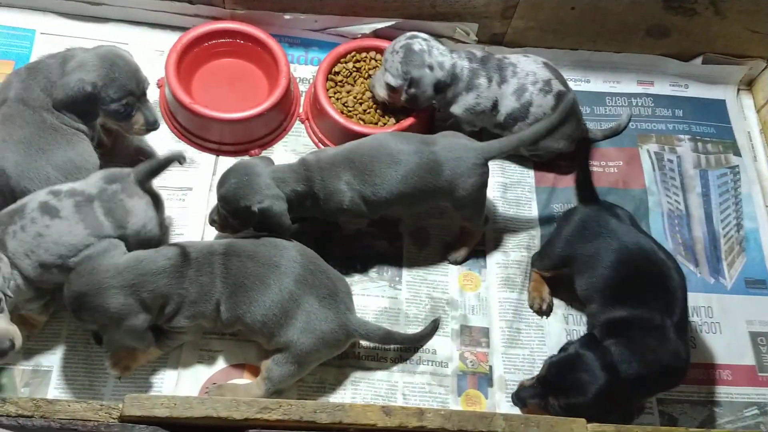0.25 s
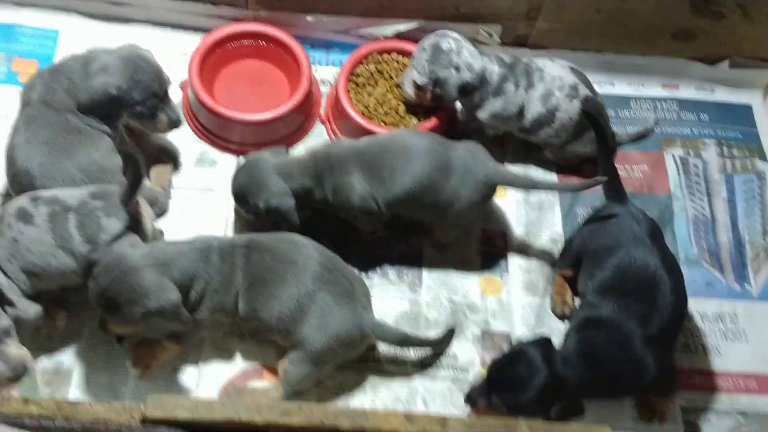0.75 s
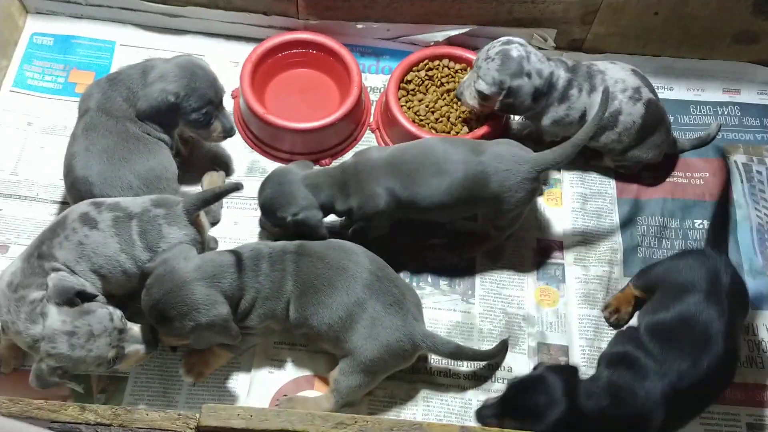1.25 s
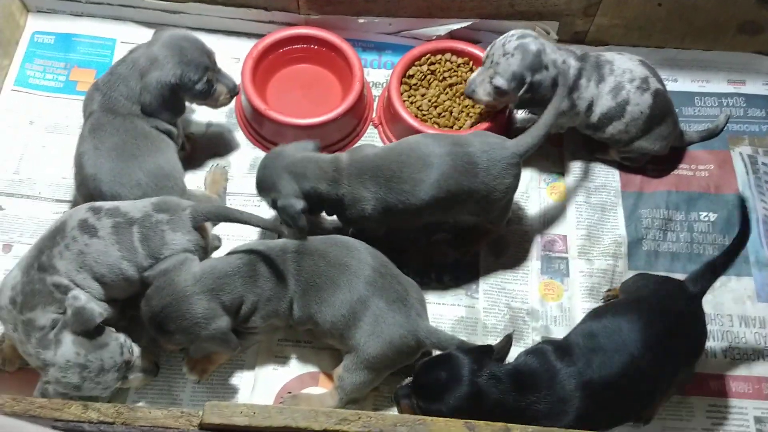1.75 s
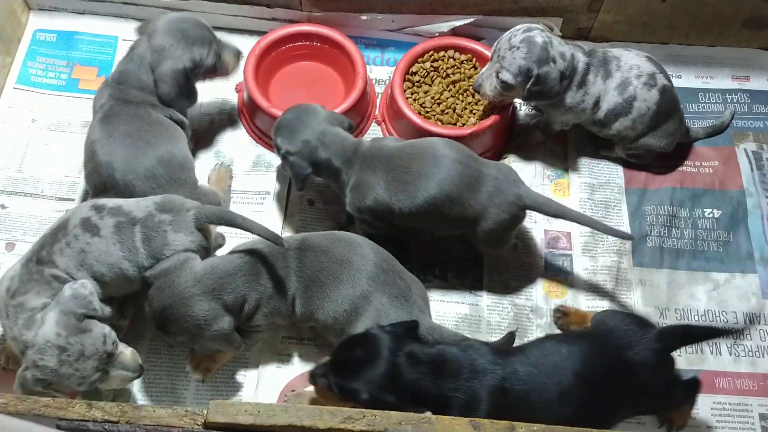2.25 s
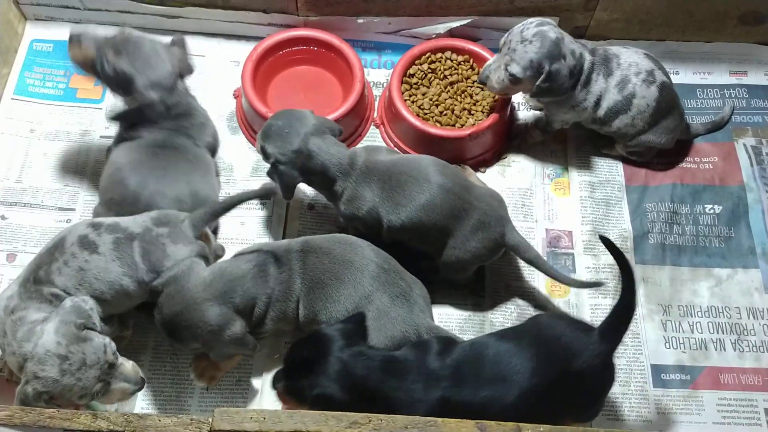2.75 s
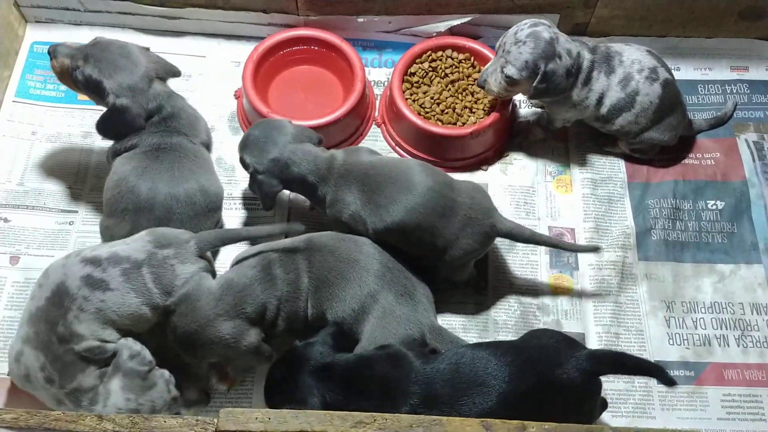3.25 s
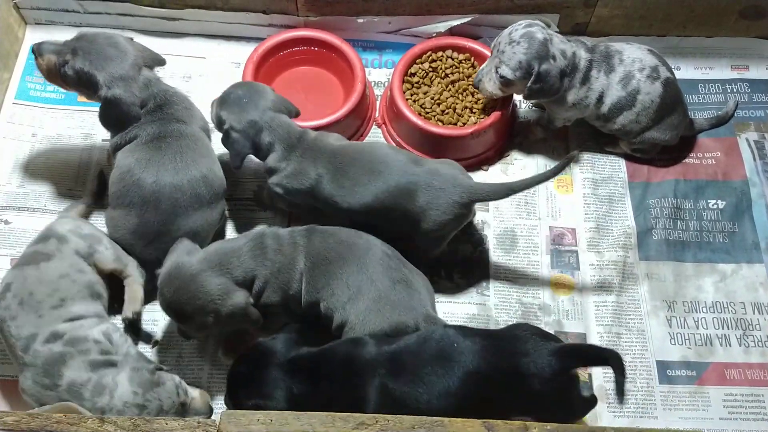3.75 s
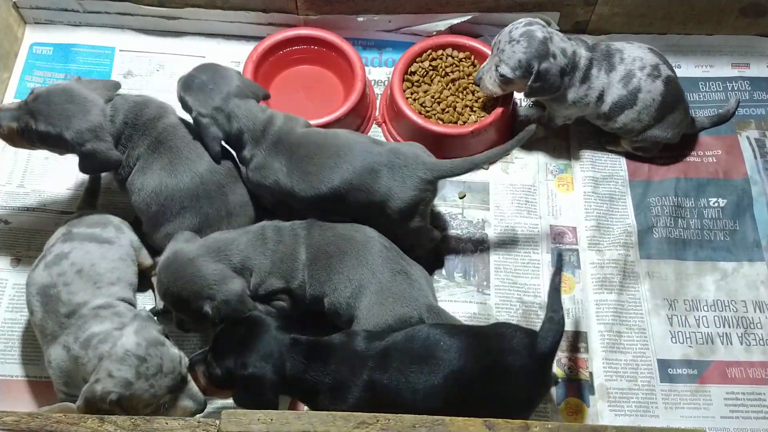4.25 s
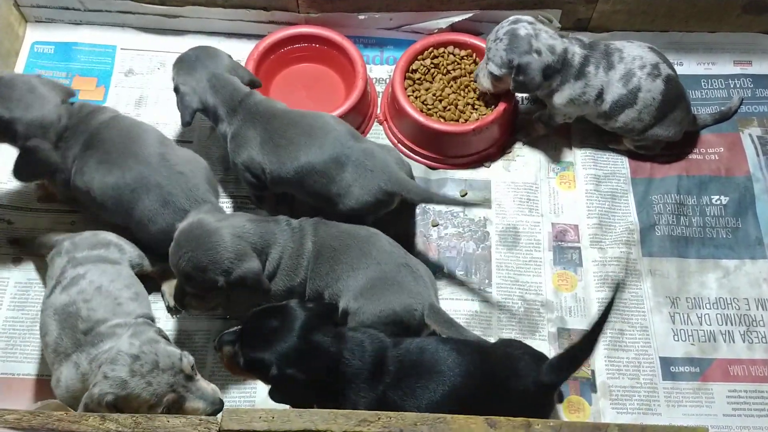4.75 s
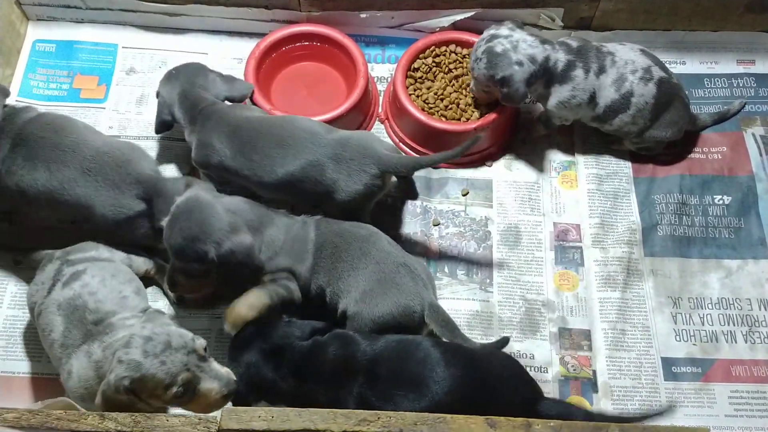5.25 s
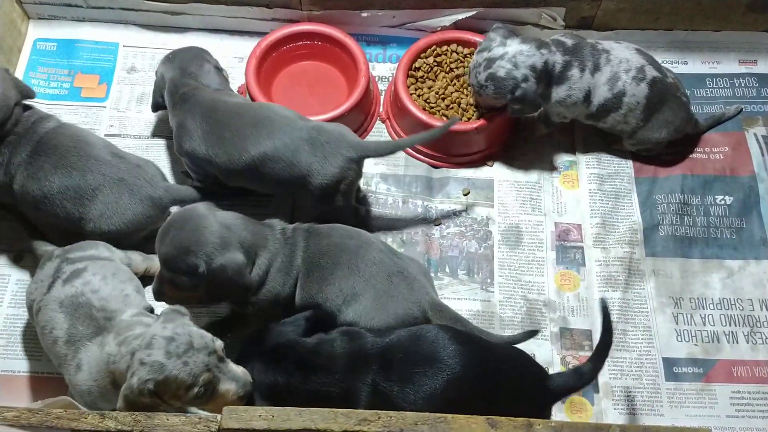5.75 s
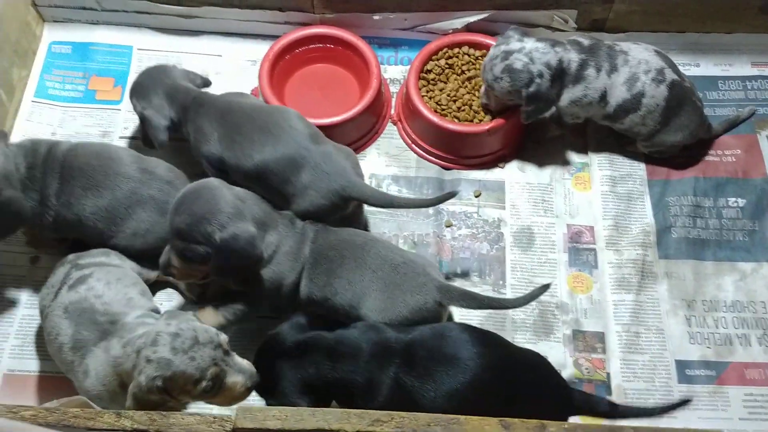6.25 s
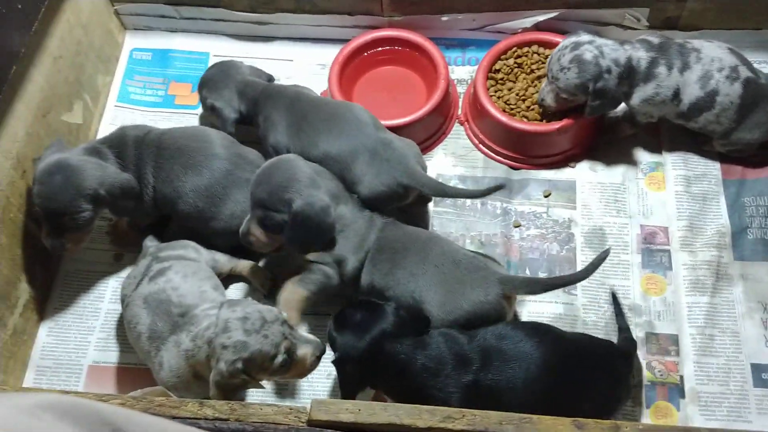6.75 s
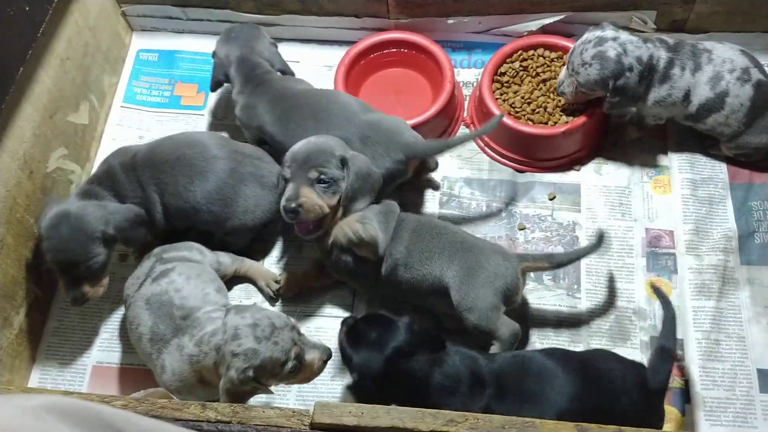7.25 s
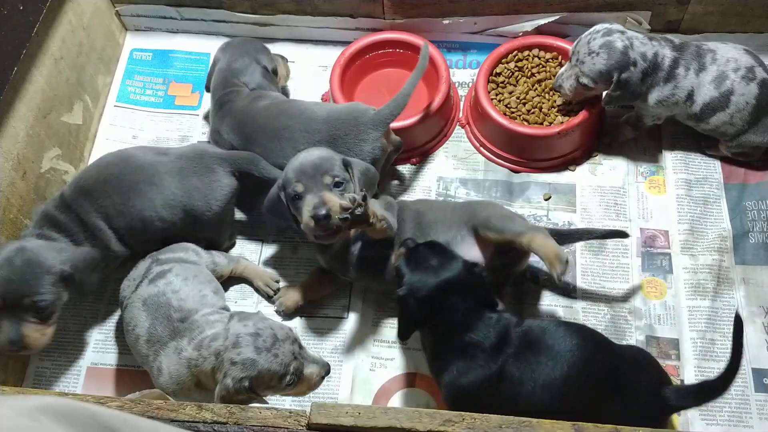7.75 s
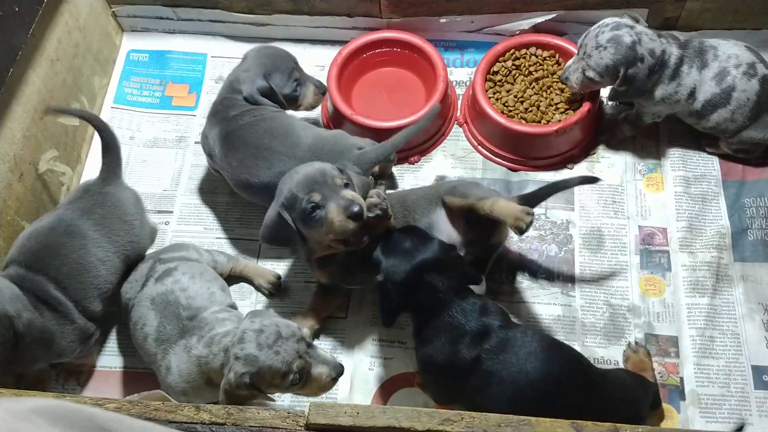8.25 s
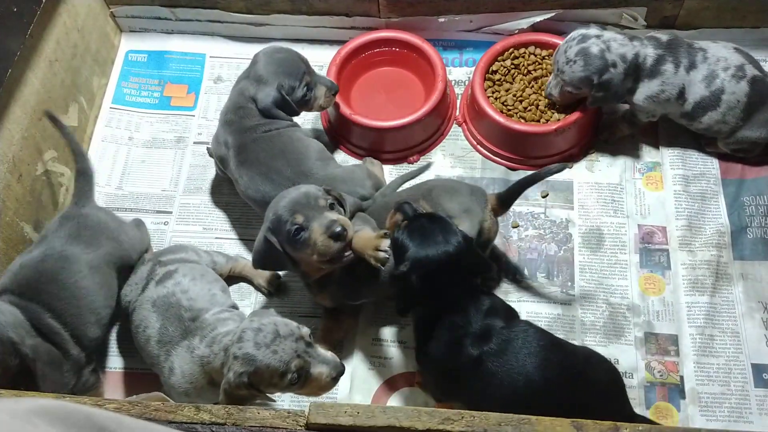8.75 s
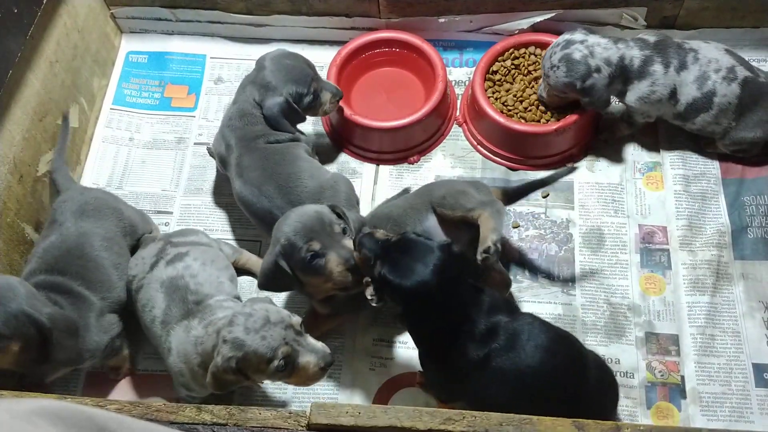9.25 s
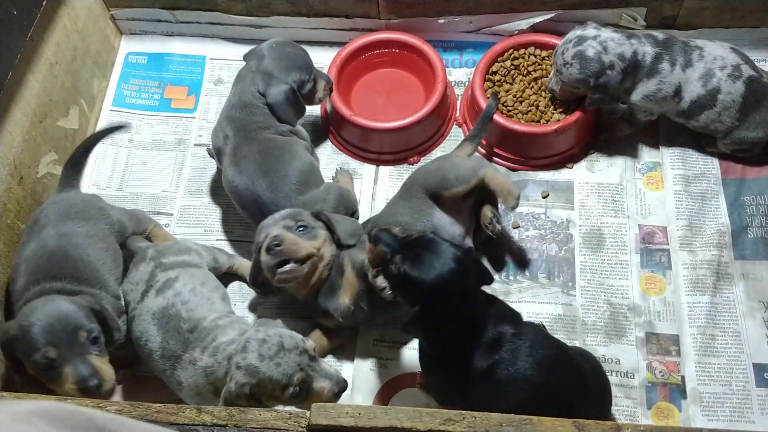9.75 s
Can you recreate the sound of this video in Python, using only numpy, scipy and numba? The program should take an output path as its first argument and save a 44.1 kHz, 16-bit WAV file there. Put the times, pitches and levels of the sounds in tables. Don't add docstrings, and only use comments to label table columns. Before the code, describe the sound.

Several small puppies move about in a wooden box lined with newspaper. Paws knock on loose boards, claws tick, paper crackles and fur brushes past. Faint whines give way to two quick yaps and a short growl early on; the middle is mostly busy scuffling. Late come a loud breaking yelp, a hoarse grunt, a low moan, a rising yip and a piercing whine at the very end. Close handheld phone, small dull room, very quiet background.

```python
import sys
import numpy as np
from scipy import signal
from scipy.fft import rfft, irfft, next_fast_len
from scipy.io import wavfile
from scipy.ndimage import uniform_filter1d
from numba import njit

SR = 44100
rng = np.random.default_rng(int(sys.argv[2]) if len(sys.argv) > 2 else 0)


def convert_level_to_amplitude(level_db):
    exponent = np.asarray(level_db, float) / 20
    return 10 ** exponent


def transcribe(u):
    v = np.clip(np.atleast_2d(u).T, -1, 1)
    q = np.round(v * 32767).astype(np.int16)
    wavfile.write(sys.argv[1], SR, q)


N = 440118
T = np.arange(N) / SR

# (overtone fall/dB per octave, [(t/s, pitch f/Hz, level/dB), ..])
YELP = [
    (6, [(7.732, 1060, -46), (7.756, 1044, -33), (7.782, 1078, -36), (7.802, 1085, -40), (7.826, 1055, -34), (7.838, 1020, -30.5), (7.846, 885, -37), (7.857, 860, -31.5), (7.88, 850, -44)]),
    (14, [(7.878, 855, -45), (7.89, 857, -40), (7.94, 835, -57)]),
]
CRIES = [
    (20, [(2.225, 838, -59), (2.25, 882, -46.5), (2.27, 892, -60), (2.285, 814, -46)]),
    (10.5, [(2.285, 1004, -50), (2.31, 1033, -64), (2.325, 900, -45.5), (2.342, 863, -46.5), (2.365, 888, -53.5), (2.44, 943, -69)]),
    (19.2, [(8.245, 325, -50), (8.27, 250.4, -43.5), (8.31, 250, -56)]),
    (16, [(9.325, 600, -65), (9.378, 565, -56)]),
    (13.2, [(9.39, 569, -52), (9.41, 570, -45), (9.432, 670, -45.5), (9.455, 748, -36), (9.47, 860, -40.5), (9.482, 810, -52)]),
]
GRUNTS = [
    (4, [(8.085, 350, -61), (8.11, 345, -58), (8.123, 400, -45), (8.131, 415, -52), (8.142, 415, -43), (8.149, 400, -58), (8.182, 315, -59), (8.196, 310, -65), (8.24, 305, -68)]),
]
ANSWERS = [ (20, [(1.31, 378, -51), (1.36, 392, -86), (1.41, 378, -67)]), (20, [(1.39, 636, -78),
           (1.47, 645, -80.5)]), (19.1, [(1.645, 885, -65), (1.665, 892, -67), (1.69, 853, -74)]),
           (20, [(1.71, 887, -60), (1.745, 884, -70)]), (20, [(1.945, 860, -66), (2.02, 868, -80)]),
           (21.2, [(2.785, 354, -57), (2.8, 346, -67.5), (2.86, 352, -83.5)]), (20, [(.872, 960, -59.5),
           (.93, 1053, -68)]), (20.1, [(3.483, 507, -58), (3.5, 516, -56), (3.51, 515, -74),
           (3.517, 510, -60), (3.528, 506, -69), (3.54, 500, -65), (3.58, 500, -73)]),
           (20, [(3.405, 467, -59), (3.44, 452, -67.5)]), (22, [(4.035, 858, -49), (4.05, 855, -42.5),
           (4.075, 844, -58)]), (20, [(8.48, 255, -65), (8.58, 248, -70)]), (20.1, [(8.7, 332, -62),
           (8.77, 282, -67)]), (19.4, [(6.43, 598, -76.5), (6.56, 580, -81.5)]), (19, [(7.3, 667, -68),
           (7.42, 582, -78)]), (21.1, [(2.368, 805, -41), (2.395, 570, -63), (2.42, 500, -71)]),
           (19, [(7.865, 1000, -43), (7.896, 1015, -41), (7.918, 1041, -50), (7.94, 1070, -48),
           (7.976, 1000, -38), (7.99, 960, -43), (8.006, 745, -44), (8.022, 595, -50)]),
           (13.4, [(9.475, 976, -49), (9.55, 837, -62)]), ]
WHINES = [
    (26, [(0.0, 2813, -69.5), (0.34, 2683, -71)]),
    (25, [(0.0, 3620, -76.5), (0.33, 3330, -75.5)]),
    (24.5, [(2.945, 2450, -59), (3.0, 2485, -62)]),
    (13, [(9.884, 1744, -57), (9.904, 1764, -37), (9.918, 1785, -40), (9.927, 1837, -50), (9.933, 1894, -39), (9.939, 1844, -46), (9.96, 1834, -43), (9.995, 1770, -30)]),
    (25, [(8.108, 4750, -76), (8.135, 4970, -59), (8.168, 4780, -69)]),
]
# (start t/s, end t/s, pulse rate/Hz, chest ring f/Hz, peak level/dB)
GROWLS = [
    (5.735, 5.93, 41, 275, -49),
    (2.374, 2.44, 95, 790, -38),
]
# (f/Hz, level/dB)
THROAT = [(330, -15), (750, 0), (2200, 4), (2600, -22), (3200, -11), (4300, -15), (5200, -2), (6200, -12),
          (12000, -13)]

# (t/s, peak level/dB, ring f/Hz)
KNOCKS = [(0.07, -50.5, 850), (0.577, -42, 787), (0.869, -48, 946), (1.172, -51.5, 727),
          (1.309, -47.5, 860), (1.491, -40.5, 932), (1.912, -47, 1670), (2.161, -36, 1510),
          (2.538, -40, 660), (1.265, -57, 1670), (1.822, -58.5, 756), (1.857, -57, 1880),
          (3.104, -45.5, 856), (3.17, -51, 810), (3.209, -50.5, 790), (4.304, -48.5, 1025),
          (4.683, -51, 500), (4.958, -54.5, 813), (5.066, -48, 491), (5.272, -34, 1497), (5.709, -45, 870),
          (7.222, -54, 1130), (7.536, -49.5, 836), (8.605, -49, 1160), (9.947, -44, 810), (3.124, -51, 950),
          (3.243, -54.5, 860), (3.603, -41, 906), (4.04, -43, 867), (4.285, -51.5, 900),
          (4.533, -48.5, 1045), (4.81, -41.5, 860), (5.158, -40, 907), (5.479, -31, 877),
          (5.927, -51.5, 814), (6.387, -50.5, 1356), (7.496, -46, 1320), (7.693, -40.5, 1270),
          (8.03, -36.5, 826), (8.403, -40.5, 980), (8.659, -44.5, 1180), (8.327, -40.5, 608)]
# (t/s, peak level/dB, ring f/Hz, box hum level/dB)
SLUMPS = [(0.06, -63, 233, -62.5), (0.388, -38, 430, -55.5), (1.115, -50, 282, -65.5),
          (1.494, -57, 262, -60.5), (2.175, -42, 242, -57.5), (2.135, -59, 256, -69),
          (2.47, -55, 230.6, -74), (2.538, -40.5, 314, -47), (2.789, -78.5, 373, -81.5),
          (3.071, -48.5, 417, -69.5), (3.407, -49.5, 450, -95), (3.482, -51.5, 522, -97),
          (3.66, -41.5, 313, -56), (3.876, -50, 270, -57), (3.352, -54.5, 360, -78),
          (4.031, -46, 316, -53.5), (4.236, -68, 242, -60.5), (4.482, -54, 440, -61),
          (4.571, -54, 270, -62), (4.72, -44, 339, -58), (5.157, -47.5, 210, -51),
          (5.271, -37.5, 168, -47.5), (5.454, -41, 180, -50.5), (5.707, -49, 220, -55.5),
          (6.195, -54.5, 249, -76), (6.383, -63, 231, -77), (7.455, -47.5, 190, -65.5),
          (7.654, -59, 226, -63), (8.325, -41, 425, -50.5), (8.475, -56.5, 251, -65.5),
          (8.79, -48.5, 234, -69), (9.176, -48.5, 241, -58.5), (9.317, -59, 243, -66),
          (9.514, -40, 242, -49)]
# (t/s, peak level/dB, ring f/Hz)
JOLTS = [
    (5.275, -45.5, 67.6),
    (6.64, -66, 94),
    (8.03, -57.5, 115),
]
# (f/Hz, width/Hz, level/dB)
BOX = [(192, 10, 8.5), (242, 60, 9), (420, 46, 8.5)]

# (t/s, peak level/dB, ring f/Hz)
TICKS = [(.3137, -57.5, 2820), (.3825, -41, 2740), (0.3965, -39, 2770), (.5846, -45.5, 2940),
         (1.4925, -55.5, 2950), (2.0298, -47, 3050), (2.2657, -54.5, 2510), (2.5381, -50.5, 3250),
         (3.1058, -46.5, 2820), (4.2482, -60, 3560), (4.4897, -42, 2680), (4.6838, -57, 3440),
         (5.1422, -52, 3310), (5.3133, -32.5, 2890), (5.4819, -33.5, 2710), (7.1691, -52.5, 3140),
         (7.2799, -50.5, 3200), (7.3168, -36, 3160), (8.2926, -41, 2510), (9.6739, -43, 3530),
         (1.7125, -34.5, 3060), (1.917, -45, 3600), (2.164, -40.5, 2570), (3.1255, -32, 2500),
         (3.6042, -31, 2730), (4.3355, -30, 3440), (4.527, -41.5, 2930), (4.695, -34.5, 2880),
         (5.1591, -23.5, 3570), (5.2722, -24, 2730), (5.5495, -36, 3600), (6.5745, -42, 2840),
         (7.5002, -40.5, 2550), (7.5343, -34.5, 2580), (8.013, -41, 3190),
         (1.178, -57.5, 9100), (2.208, -54, 5230), (2.4, -56, 5100), (2.627, -55.5, 3800),
           (2.7185, -51, 5000), (6.418, -45.5, 9300), (9.746, -46, 3240), (0.404, -46, 2720),
           (0.78, -55.5, 2840), (2.471, -42, 5360), (3.1725, -42.5, 7770), (3.4037, -52, 10000),
           (4.2633, -47, 7590), (4.271, -48, 10500), (5.7043, -50.5, 5550), (5.908, -61.5, 4850),
           (5.9295, -48.5, 5190), (6.262, -49, 7410), (6.8034, -54.5, 7840), (7.0593, -43, 8510),
           (8.2604, -43, 7530), (8.905, -42.5, 7740), (9.5653, -42, 5130), (9.951, -42, 5350),
           (2.828, -48.5, 5540), (3.282, -47.5, 5400), (3.3511, -36.5, 7840), (4.8112, -31, 6800),
           (5.368, -38.5, 5500), (5.4426, -39.5, 11340), (5.7419, -38, 10800), (6.1988, -44, 7700),
           (6.662, -40, 6530), (7.656, -41.5, 5400), (7.6956, -36.5, 5800), (8.3236, -38, 10400),
           (8.408, -40.5, 4770)]
# (t/s, peak level/dB, ring f/Hz)
SWISHES = [(.7, -60, 4880), (0.63, -66, 8900), (1.1, -60.5, 9000), (.505, -49, 9000), (.41, -42.5, 2900),
           (.45, -46.5, 2500), (1.108, -64, 8500), (0.91, -53.5, 2300), (0.73, -53, 2400),
           (8.12, -53.5, 4700), (3.57, -65.5, 9700), (4.118, -64, 9000), (6.025, -62, 3000),
           (2.5, -55, 8200), (2.6625, -57, 3400), (2.7192, -52.5, 4800), (6.0911, -54.5, 6800)]
# (f/Hz, level/dB per Hz)
PAPER = [(1060, -49.5), (1800, -5.5), (2160, -3.5), (3290, -9), (4330, -8.5), (5340, -8.5), (6590, -7.5),
         (9770, -6), (16000, -23.5)]

# (loudest t/s, level/dB, swell/s, decay/s)
RUSTLES = [(.26, -65, 0.18, 0.096), (.41, -55, 0.11, 0.37), (1.19, -64.5, 0.083, 0.26),
           (1.5, -63, 0.023, 0.13), (1.72, -58.5, 0.0093, 1.38), (2.34, -65.5, 0.79, 1.1),
           (2.51, -61, 0.63, 0.083), (2.87, -59.5, 0.15, 0.27), (3.13, -57.5, 0.028, 0.35),
           (3.42, -61.5, 0.3, 0.32), (3.625, -46, 0.021, 0.061), (3.71, -52, 0.11, 0.15),
           (3.87, -58.5, 0.3, 0.17), (4.06, -62, 0.28, 0.22), (4.28, -48.5, 0.054, 0.19),
           (4.57, -60.5, 0.19, 0.11), (4.7, -58, 0.019, 0.21), (4.82, -61.5, 0.032, 2.1),
           (5.16, -56.5, 0.11, 0.23), (5.28, -57.5, 0.032, 0.42), (5.49, -69, 0.25, 2.3),
           (.735, -74.5, 0.051, 0.026), (6.21, -60.5, 0.075, 0.17), (6.445, -57.5, 0.077, 0.048),
           (6.59, -54, 0.041, 0.052), (7.33, -62.5, 1.28, 0.32), (7.54, -63.5, 0.36, 0.11),
           (7.96, -53.5, 0.77, 0.077), (8.15, -53, 0.21, 0.13), (8.5, -60.5, 1.16, 3.35),
           (9.03, -60, 0.083, 0.15), (9.35, -56, 0.29, 0.65), (9.9, -56.5, 0.63, 2.7)]
# (t/s, level/dB, decay/s)
SCRAPES = [(.08, -67, 1.9), (0.411, -46, 0.2), (0.787, -65, 0.21), (1.319, -61, 0.15), (1.716, -62, 0.49),
           (2.18, -65.5, 0.099), (2.55, -94, 0.081), (3.129, -65, 0.7), (3.62, -53, 0.32),
           (4.05, -57, 0.22), (4.566, -58.5, 0.019), (4.82, -48, 0.092), (5.158, -46.5, 0.076),
           (5.279, -47, 0.18), (5.49, -51, 0.17), (5.718, -53, 0.028), (6.586, -59, 0.057),
           (7.121, -66.5, 1.6), (7.537, -51, 0.059), (7.699, -59, 2.56), (8.01, -49, 0.099),
           (8.328, -50.5, 0.079), (8.667, -48.5, 0.029), (9.199, -59.5, 0.124), (9.37, -50.5, 0.32),
           (9.82, -62, 1.2), (9.031, -68.5, 1.1), (1.11, -69, 0.23)]
# (t/s, level/dB)
BRUSHES = [(0.079, -66.5), (0.408, -42.5), (1.315, -57.5), (2.179, -48), (2.4, -58), (3.128, -62),
           (3.671, -49), (4.052, -47.5), (4.821, -54.5), (5.072, -61.5), (5.49, -70), (5.718, -63),
           (7.479, -67.5), (8.01, -59), (8.156, -44.5), (8.332, -65), (8.67, -56.5), (9.951, -57)]

# (f/Hz, level/dB per Hz)
HUSH = [(40, 1), (120, -4.5), (1000, 1), (3000, -3), (8000, -6), (16000, -15.5)]
# (f/Hz, level/dB)
RIGHT = [(300, 1), (1700, 2.5), (2180, .1), (3000, 1), (4400, .1), (8000, .5), (12000, 5.5), (14500, 6.5)]
# (f/Hz, least share)
SCATTER = [(60, 1), (400, 0.42), (1000, 0.15), (2200, .05), (4400, .07), (6600, .15), (14000, .62)]


def voices(calls, rough, edge_s, gain_db, top_hz=15000):
    out, shake, flutter, uneven = np.zeros(N), walk(300), walk(90), walk(45)
    for fall_db, call in calls:
        s, *columns = np.transpose(call)
        on = slice(int(s[0] * SR), int(s[-1] * SR))
        hz, db = (uniform_filter1d(np.interp(T[on], s, c), size=150, mode="nearest") for c in columns)
        breathy = rough * np.where(hz > 2200, 2.5, 1)
        phase = 2 * np.pi * np.cumsum(hz * (1 + .08 * breathy * shake[on])) / SR
        tone = np.zeros(len(hz))
        for k in range(1, 16):
            sway_db = min(k - 1, 3.5) * uneven[k * 20000 + on.start // 5:][:len(hz)]
            throat_db = along(THROAT, k * hz) - along(THROAT, hz)
            size = convert_level_to_amplitude(sway_db + throat_db - fall_db * np.log2(k))
            size = size * (k * hz < 15500) / (1 + (k * hz / top_hz) ** 3)
            tone += size * np.sin(k * phase + k * k)
        to_edge_s = np.minimum(T[on] - s[0], s[-1] - T[on] + 0.00076)
        edge = np.sin(np.pi / 2 * np.clip(to_edge_s / edge_s, 0, 1)) ** 2
        out[on] += np.sqrt(2) * convert_level_to_amplitude(db + gain_db + 18.2 * breathy * flutter[on]) * edge * tone
    return out


def growl():
    out = np.zeros(N)
    for start, end, rate, hz, db in GROWLS:
        size = int(5.6 * SR / hz)
        ring = np.sin(2 * np.pi * hz * T[:size]) * np.hanning(size)
        for s, (late, loud) in zip(np.arange(start, end, 1 / rate), rng.standard_normal((20, 2))):
            fade_db = 11 * (s - start) / (end - start)
            add(out, s + .08 / rate * late, convert_level_to_amplitude(db + 1.5 * loud - fade_db) * ring)
    return out


def thuds(table, t60_s):
    out = np.zeros(N)
    for s, db, hz, *_ in table:
        noise = rng.standard_normal((2, SR // 3))
        noise[:, 0] += 500 / np.sqrt(hz)
        rings = 0.12 * min(hz / 200, 1) ** 2 * svf(svf(noise[1], 810.0, 1400.0), 810.0, 1400.0)
        for ratio, gain in ((1., 1), (1.7, .3)):
            rings += gain * svf(svf(noise[0], ratio * hz, .14 * hz), ratio * hz, .45 * hz)
        add(out, s, convert_level_to_amplitude(db) * blow(rings, t60_s, crack_s=.006, tail_db=-9, rise_s=.3 / hz))
    return out


def ticks(table, crack_s, tail_db, rise_s, snap, wide):
    out = np.zeros(N)
    for s, db, hz in table:
        noise = rng.standard_normal(SR // 5)
        noise[20] += snap
        noise = colour(noise, PAPER)
        rings = svf(noise, 1. * hz, 0.38 * hz) + wide * noise
        add(out, s, convert_level_to_amplitude(db + 2.0) * blow(rings, 0.075, crack_s, tail_db, rise_s))
    return out


def shuffle():
    scrapes = [(s, db, 0.014, dies_s) for s, db, dies_s in SCRAPES]
    brushes = [(s, db, 0.034, 0.16 * convert_level_to_amplitude(-0.28 * (db + 55.0))) for s, db in BRUSHES]
    hums = [(s + 0.005, db, 0.01, 0.13) for s, _, _, db in SLUMPS]
    paper_db = movements(RUSTLES, 1.08)
    claws_db = movements(scrapes, 0.49)
    fur_db = movements(brushes, 0.87)
    boards_db = movements(hums, 0.97)

    sheet = colour(convert_level_to_amplitude(2.2 * walk(35)) * crackle(1200, 2.2), PAPER)
    grit = crackle(900, 2.6)
    paper = sum(convert_level_to_amplitude(2.5 * walk(14)) * svf(sheet, hz, .4 * hz) for hz in 2600 * 1.35 ** np.arange(7.))
    claws = sum(convert_level_to_amplitude(3 * walk(23)) * svf(grit, hz, 0.22 * hz) for hz in (1250., 1550., 1950.))
    fur = sum(convert_level_to_amplitude(3 * walk(20)) * svf(svf(grit, hz, 0.18 * hz), hz, .4 * hz) for hz in (600., 730., 880.))
    boards = np.zeros(N)
    for hz, width, db in BOX:
        boards += convert_level_to_amplitude(db + 2.6 * walk(30)) * svf(svf(grit, 1. * hz, 1. * width), 1. * hz, 2. * width)
    layers = (paper, paper_db), (claws, claws_db), (fur, fur_db), (boards, boards_db)
    return sum(convert_level_to_amplitude(db - .3) * level(x, 0) for x, db in layers)


def crackle(rate_hz, spread_db):
    sizes = convert_level_to_amplitude(spread_db * np.minimum(rng.exponential(size=N), 4))
    creases = (rng.random(N) < rate_hz / SR) * sizes * rng.standard_normal(N)
    return level(creases, 0) + level(rng.standard_normal(N), -2.7)


def movements(rows, sudden):
    t, power = T[::32], 1e-13
    for s, db, swell_s, dies_s in rows:
        before = 1 - np.clip(1 - (s - t) / (2 * max(swell_s, .005)), 0, 1) ** sudden
        down_db = np.where(t < s, 60 * before, 30 * (t - s) / max(dies_s, .02))
        power = power + convert_level_to_amplitude(2 * (db - down_db))
    return np.interp(T, t, 10 * np.log10(power))


def blow(rings, t60_s, crack_s, tail_db, rise_s):
    t = T[:len(rings)]
    shape = np.exp(-t / crack_s) + convert_level_to_amplitude(tail_db) * np.exp(-np.log(1000) * t / t60_s)
    x = rings * shape * (1 - np.exp(-t / rise_s))
    return x / np.max(abs(x))


def room(x):
    t60_s, damp, room_db = 0.28, 0.34, -13
    lags = rng.integers(500, 2200, 8)
    gain = convert_level_to_amplitude(-60 * lags / SR / t60_s)
    return convert_level_to_amplitude(room_db) * walls(x + 1e-18, lags, gain, damp).sum(axis=0)


@njit
def walls(x, lags, gain, damp):
    line, soft, out = np.zeros((8, 4096)), np.zeros(8), np.zeros((2, len(x)))
    for i in range(len(x)):
        total = 0.
        for k in range(8):
            soft[k] += (1 - damp) * (gain[k] * line[k, (i - lags[k]) & 4095] - soft[k])
            total += soft[k]
            out[k % 2, i] += soft[k]
        for k in range(8):
            line[k, i & 4095] = x[i] + soft[k] - total / 4
    return out


def hush():
    return level(colour(rng.standard_normal(N), HUSH), -66.5)


def level(x, db):
    return x * convert_level_to_amplitude(db) / np.sqrt(np.mean(x ** 2))


def along(points, hz):
    f, v = np.transpose(points)
    return np.interp(np.log(np.maximum(hz, 1)), np.log(f), v)


def colour(x, points):
    size = next_fast_len(len(x))
    gain = convert_level_to_amplitude(along(points, np.fft.rfftfreq(size, 1 / SR)))
    return irfft(rfft(x, size) * gain, size)[:len(x)]


@njit
def svf(x, hz, width):
    y, b, l = np.empty(len(x)), 0., 0.
    g, k = np.tan(np.pi * hz / SR), width / hz
    for i in range(len(x)):
        v = (b + g * (x[i] - l)) / (1 + g * (g + k))
        b, l, y[i] = 2 * v - b, l + 2 * g * v, k * v
    return y


def walk(rate_hz):
    k = int(SR / rate_hz)
    held = np.repeat(rng.standard_normal(N // k + 1), k)
    return 1.3 * uniform_filter1d(uniform_filter1d(held, k), k)[:N]


def add(out, s, x):
    i = int(s * SR)
    out[i:i + len(x)] += x[:len(out) - i]


def ports(x, lean_db=0, spread=.85):
    lag_s, scatter_late_s, bass_hz = 20.25 / 44100, .0017, 1075
    hz, _, z = signal.stft(x, SR, nperseg=512, noverlap=384)
    turn = np.exp(2j * np.pi * hz * lag_s)
    phase = np.angle(-turn - .5 / turn) * (hz > bass_hz)
    right = convert_level_to_amplitude((along(RIGHT, hz) + lean_db * (hz > 1400)) / 2)[:, None]
    unlike = (hz > bass_hz) * np.sin(2 * np.pi * hz * lag_s) ** 2
    apart = np.minimum(along(SCATTER, hz) + spread * unlike, 1)
    drift = rng.standard_normal(z.shape)
    drift = uniform_filter1d(uniform_filter1d(drift, size=24, axis=0), size=24, axis=1)
    wander = np.exp(2.2j * drift / drift.std() - 2j * np.pi * hz[:, None] * scatter_late_s)
    around = apart[:, None] * wander * z
    sides = np.array([(z + around) / right, (z - around) * right * np.exp(1j * phase)[:, None]])
    return signal.istft(sides, nperseg=512, noverlap=384)[1][:, :N]


def denoise(x, over_db=1.0, depth_db=-19.0):
    _, _, z = signal.stft(x, nperseg=512, noverlap=384)
    power = uniform_filter1d(uniform_filter1d(abs(z) ** 2, size=9, axis=1), size=7, axis=2)
    steady = np.percentile(power[:, :, ::4], 6, axis=2, keepdims=True) * convert_level_to_amplitude(2 * over_db)
    gain = np.maximum(1 - steady / (power + 1e-20), convert_level_to_amplitude(depth_db))
    return signal.istft(z * gain, nperseg=512, noverlap=384)[1][:, :N]


def scene():
    calls = voices(CRIES, rough=0.018, edge_s=0.0041, gain_db=-.3)
    calls += voices(WHINES, rough=0.037, edge_s=0.0041, gain_db=-.3)
    calls += voices(ANSWERS, rough=.07, edge_s=0.0084, gain_db=-.3)
    calls += voices(GRUNTS, rough=0.14, edge_s=0.01, gain_db=2.5, top_hz=1500)
    calls += voices(YELP, rough=.01, edge_s=.003, gain_db=.5, top_hz=11000)
    calls += growl()
    paper = ticks(TICKS, crack_s=.0015, tail_db=-15, rise_s=.0002, snap=8, wide=.4)
    paper += ticks(SWISHES, crack_s=.02, tail_db=-3, rise_s=.004, snap=0, wide=.15)
    steps = thuds(KNOCKS, t60_s=0.21) + thuds(SLUMPS, t60_s=0.31) + thuds(JOLTS, t60_s=0.6)
    contact = steps + paper + shuffle()
    echo = room(contact + .3 * calls)
    port_noise = convert_level_to_amplitude(-9) * np.array([hush(), hush()])
    return ports(contact + echo + hush()) + port_noise + ports(calls, lean_db=4, spread=.08)


def low_pass(x):
    return signal.sosfilt(signal.butter(12, 16440, fs=SR, output="sos"), x)


def record(dry):
    low_cut = signal.butter(2, 95, "high", fs=SR, output="sos")
    top_cut = signal.ellip(8, .2, 45, 15750, fs=SR, output="sos")
    picked_up = signal.sosfilt(np.vstack([low_cut, top_cut]), dry)
    mix = signal.sosfilt(low_cut, denoise(picked_up))
    return low_pass(mix)


dry = scene()
out = record(dry)
transcribe(out)
```